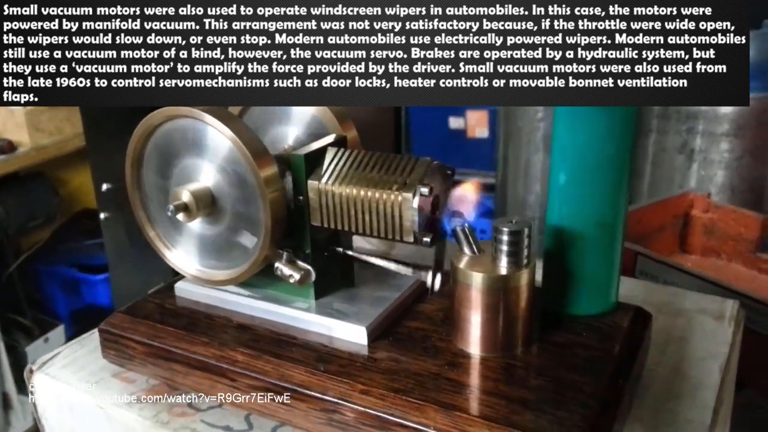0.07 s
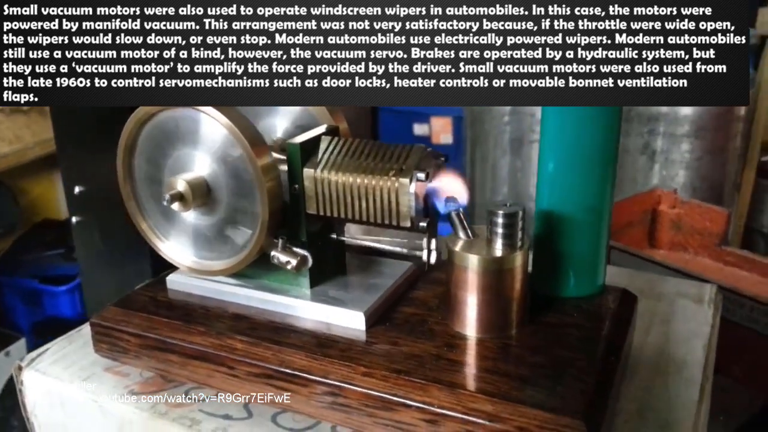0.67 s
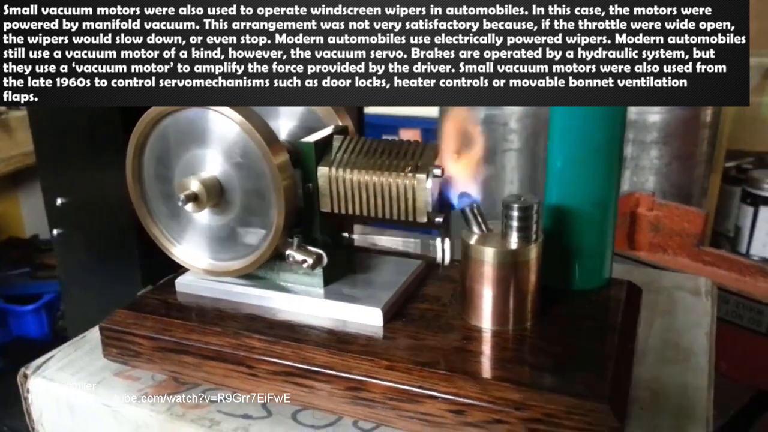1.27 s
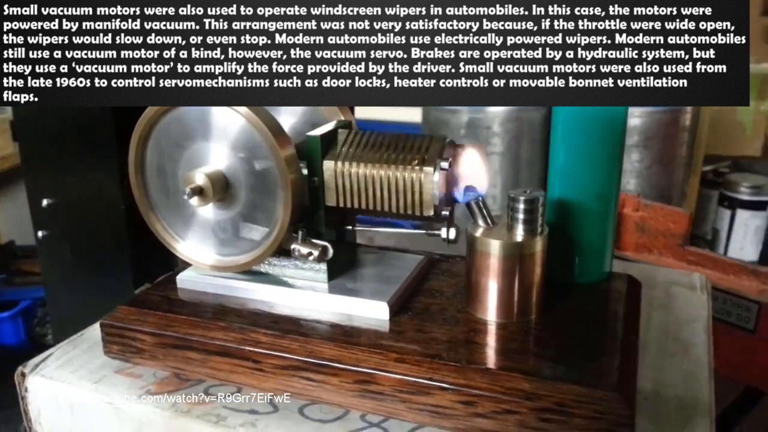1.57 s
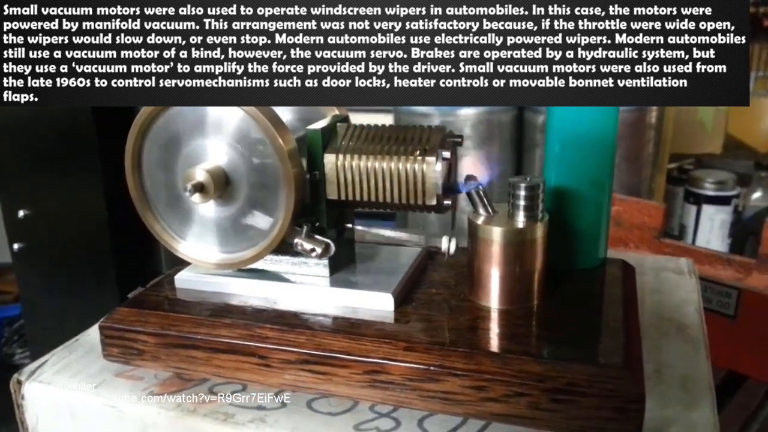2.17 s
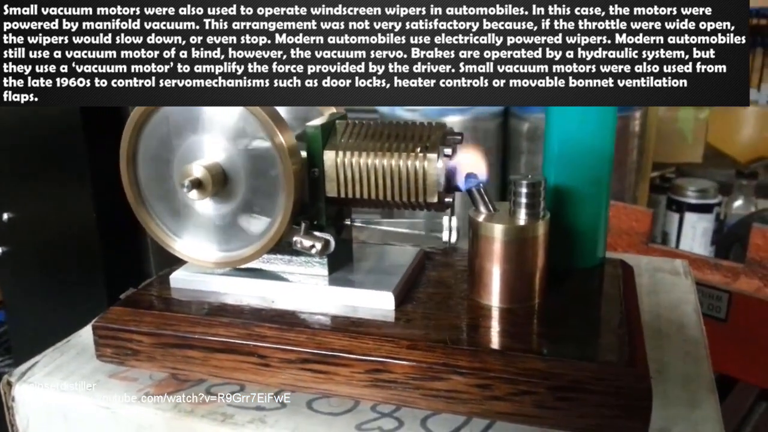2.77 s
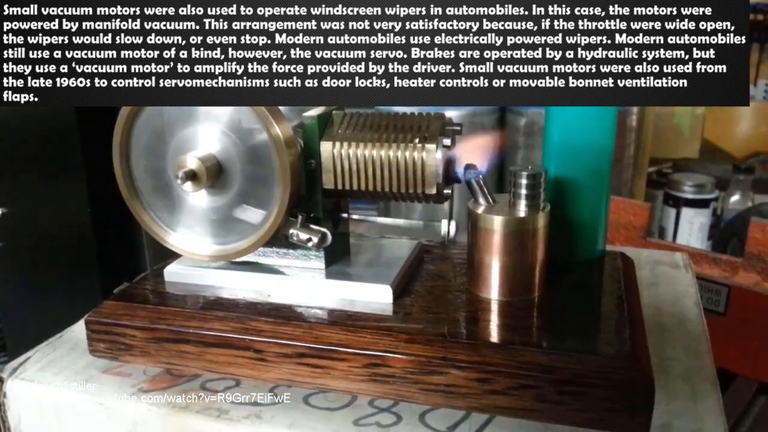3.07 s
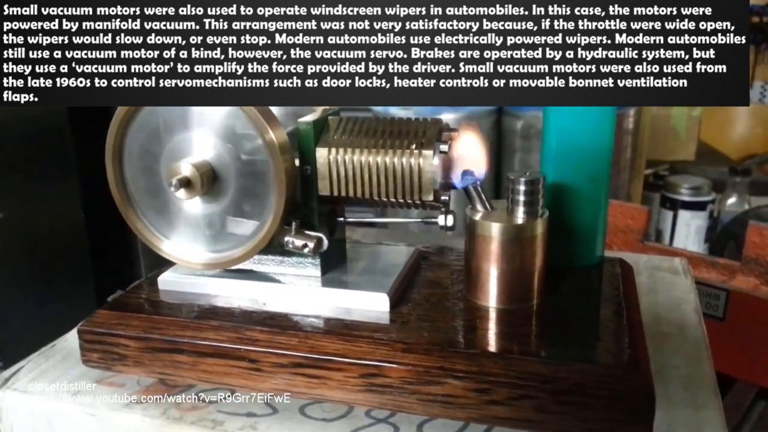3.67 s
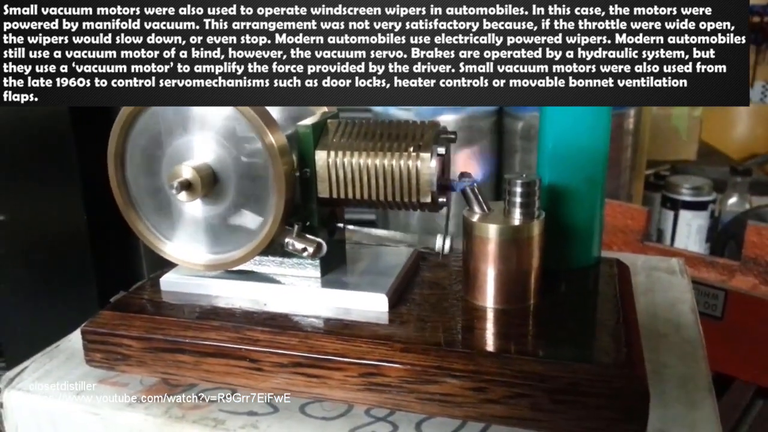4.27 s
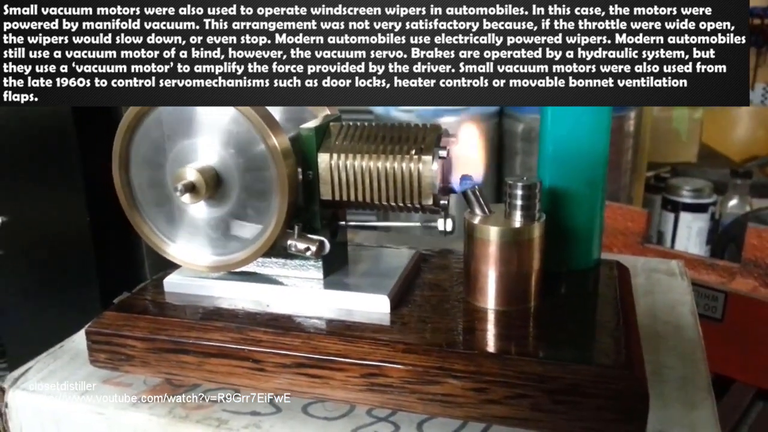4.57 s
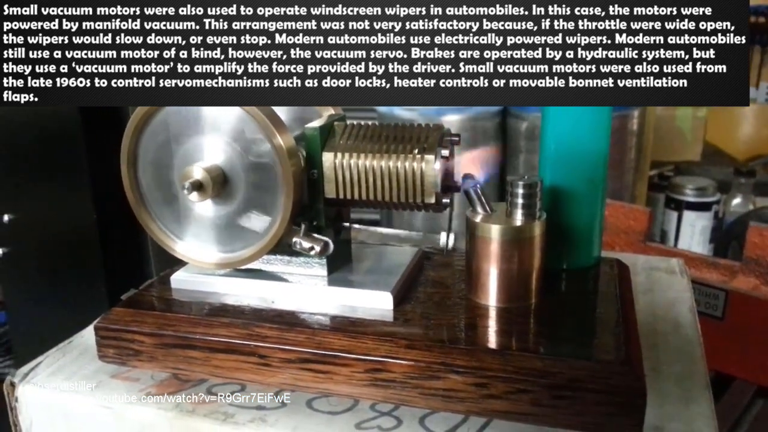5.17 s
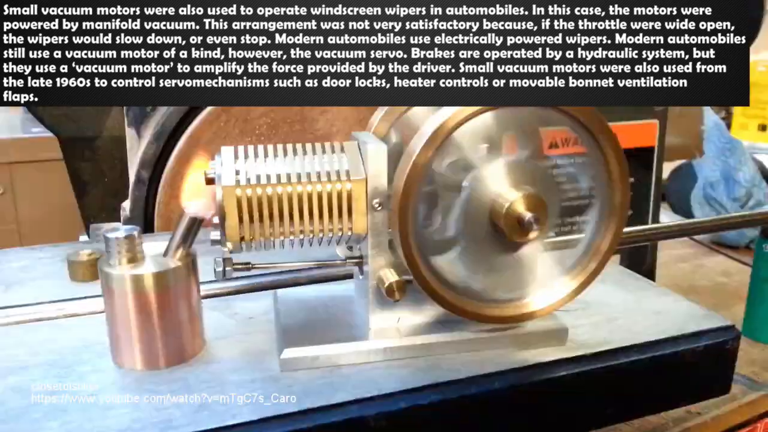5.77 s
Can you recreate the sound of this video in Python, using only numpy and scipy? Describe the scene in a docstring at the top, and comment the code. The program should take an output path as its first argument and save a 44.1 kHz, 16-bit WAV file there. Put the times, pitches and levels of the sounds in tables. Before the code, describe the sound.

A faint, steady whirr of bearings and flame is joined within 0.1 seconds by the tapping of a small flame-driven model engine on a wooden base. It runs evenly at nearly six turns a second. Each turn starts with a sharp metallic tap and knock from the shutter and a brief piston slide. A short, reedy quack of escaping gas follows, with slight hiss and a very thin, high squeak; then the linkage clicks and pings. On scattered turns a dry part gives a faint, high rub: around 0.4 to 1.1 seconds, often between 2 and 4.2, and twice after 5. The knocks are hardest near 4.8 seconds, then soften, while the beat continues until the sound ends at about 5.8. The stereo microphones are close, and the workshop adds only a slight, short reverberation.

```python
"""A faint whirr of bearings and flame, then at once the tapping of a small flame-licker engine, close to
a pair of microphones. It stands on a wooden base in a workshop and turns nearly six times a second.
Each turn the shutter taps and knocks shut, the piston slides, gas quacks out past the fluttering shutter
with a thin squeak, and the linkage clicks back. On some turns a dry part rubs before the next tap."""
import sys
import numpy as np
from scipy import signal
from scipy.fft import rfft, irfft
from scipy.io import wavfile
from scipy.ndimage import uniform_filter1d

SR = 44100
rng = np.random.default_rng(int(sys.argv[2]) if len(sys.argv) > 2 else 0)


def inscribe(sig):
    """Save sig as 16-bit PCM at rate SR to the path in sys.argv[1].

    A 1-D sig is mono; a 2-D sig holds one channel per row.
    Samples are clipped to [-1, 1] before scaling.
    """
    pcm = np.round(np.clip(np.atleast_2d(sig).T, -1, 1) * 32767)
    wavfile.write(sys.argv[1], SR, pcm.astype(np.int16))


N = 261061
TIME = np.arange(4096) / SR  # seconds into one short event


def amp(db):
    """Decibels to gain."""
    return 10 ** (np.asarray(db) / 20)


def unit_power(x):
    """Scales to a mean square of one."""
    return x / np.sqrt(np.mean(x ** 2) + 1e-20)


def at_hz(table, hz, column=1):
    """One column of a table, interpolated along log frequency."""
    columns = np.transpose(table)
    return np.interp(np.log(hz + 1), np.log(columns[0]), columns[column])


def add(mix, start_s, sound):
    """Mixes a sound in at a time."""
    part = mix[..., max(round(start_s * SR), 0):][..., :sound.shape[-1]]
    part += sound[..., :part.shape[-1]]


def convolve(x, response):
    """Filters both channels."""
    return signal.oaconvolve(x, response, axes=1)[:, :N]


def colour(x, spectrum, size=2048):
    """Causal filter of unit power gain with its own left-right balance in each band."""
    hz = abs(np.fft.fftfreq(size, 1 / SR))
    side_db = np.outer([.5, -.5], at_hz(spectrum, hz, column=2))
    gain = unit_power(amp(at_hz(spectrum, hz) + side_db))
    minimum_phase = np.exp(np.conj(signal.hilbert(np.log(gain))))
    return convolve(x, np.fft.ifft(minimum_phase).real)


def wobble(size, smooth_samples):
    """Smoothed random motion of unit power."""
    return unit_power(uniform_filter1d(rng.standard_normal(size), size=smooth_samples))


def envelope(rise, hold, t60):
    """Swells, holds until `hold`, dies away; all in seconds."""
    return np.minimum(TIME / rise, 1) ** 2 * np.exp(-np.log(1000) * np.maximum(TIME - hold, 0) / t60)


def strokes(times, level_db, scatter_db):
    """Rows of (time [s], level [dB]) with randomly scattered levels."""
    return np.column_stack([times, level_db + scatter_db * rng.standard_normal(len(times))])


def bursts(events, shape, spectrum, grit_db):
    """Gritty contact noise under one envelope for each event."""
    grit = amp(grit_db * np.clip(wobble(N, 25), -2, 2))
    contact = unit_power(np.tanh(unit_power(noise() * grit) / 2))  # no single grain outweighs the blow
    gate = np.zeros(N)
    for s, db in events:
        add(gate, s, amp(db) * shape)
    return colour(contact * gate, spectrum)


def ring(blows, modes, spread_db):
    """Blows ring a set of modes, never quite alike; high modes favour the right microphone."""
    out = np.zeros((2, N))
    hz, db, t60 = np.transpose(modes)[:, :, None]
    t = np.arange(SR // 5) / SR
    side_db = np.interp(hz.T, [2000, 6500], [1, 10]) * np.array([[-.5], [.5]])
    swell = 1 - np.exp(-t * hz / 1.95)  # a mode needs a cycle or two to build up
    for s, blow_db in blows:
        detune, spread = rng.standard_normal((2, len(modes), 1))
        fade = amp(blow_db + db + spread_db * spread) * np.exp(-np.log(1000) * t / t60)
        tones = np.sin(2 * np.pi * (hz + .5 * detune / t60) * t)
        add(out, s, amp(side_db) @ (swell * fade * tones))
    return out


def whistle(hz, waver_hz):
    """An unsteady tone of unit power, as stick and slip makes it."""
    return np.sqrt(2) * np.sin(2 * np.pi * np.cumsum(hz + waver_hz * wobble(len(TIME), 24)) / SR)


# how alike the two microphones hear noise: (frequency [Hz], likeness [0-1])
MIC_LIKENESS = [(40, 0), (150, 0.97), (1300, 1), (2500, 0.45), (5000, 0), (15000, 0.18)]
def noise():
    """Noise at the microphone pair, nearly mono in the middle range."""
    shared, separate = rfft(rng.standard_normal((2, N)))
    alike = np.clip(at_hz(MIC_LIKENESS, np.fft.rfftfreq(N, 1 / SR)), 0, 1)
    left = alike * shared + np.sqrt(1 - alike ** 2) * separate
    return irfft(np.array([left, shared]), N)


# background at the bench: (frequency [Hz], level [dB], left minus right [dB])
WHIRR_SPECTRUM = [(30.1, 8.5, 3), (113, -23, 2.5), (208, -0.5, -1.5), (365, 1.5, -4.5), (450, -7, 3.5),
                  (680, -9.5, -8), (1070, -13, 19), (1400, -8, 0.5), (2140, -8, 0.5), (4150, -12.5, -5),
                  (6850, -22.5, -2), (11000, -26, -2), (14300, -23.5, 0), (15500, -70, -19)]
def whirr():
    """Bearings and flame make a steady, faint noise under the engine."""
    return amp(-45) * colour(noise(), WHIRR_SPECTRUM)


# pace of the flywheel: (time [s], speed [turns/s])
FLYWHEEL_SPEED = [(0.0, 5.722), (1.1, 5.735), (1.9, 5.715), (2.4, 5.714), (3.1, 5.75), (3.55, 5.71),
                  (4.0, 5.758), (4.35, 5.632), (4.9, 5.649), (5.2, 5.669), (5.45, 5.82), (5.8, 5.486)]
# a dry part drags, so the shutter comes late and opens early: (turn [from 0], rub level [dB])
TIGHT_TURNS = [(2, -43), (4, -40), (6, -38.5), (11, -38), (12, -43), (15, -43), (17, -42), (18, -42.5),
               (20, -43.5), (22, -43), (23, -42.5), (24, -42.5), (29, -41.5), (31, -38.5)]
# the shutter runs loose, so it comes early, seats softly and opens late: (turn [from 0])
LOOSE_TURNS = [5, 21, 28, 30, 32]
def flywheel(first_turn_s=.0754):
    """When each turn starts, with the shutter at the port face, and whether it is tight or loose."""
    t = np.arange(N) / SR
    turned = np.cumsum(np.interp(t, *np.transpose(FLYWHEEL_SPEED))) / SR
    turned -= np.interp(first_turn_s, t, turned)
    number = np.arange(int(turned[-1]))
    tight = np.isin(number, [n for n, _ in TIGHT_TURNS])
    return np.interp(number, turned, t), tight, np.isin(number, LOOSE_TURNS)


KNOCK_S = .0038  # into the turn
# tap and knock, close to the port face: (frequency [Hz], level [dB], left minus right [dB])
TAP_SPECTRUM = [(200, -34, 0.5), (888, -36, 3.5), (1400, -18, -6), (2115, 2, -8.5), (2840, -13, 9),
                (4500, -4.5, -8.5), (5060, -23, 1), (6840, -6, -14), (8620, -20, -13.5), (9760, -20, -27),
                (11100, -20.5, 10), (14440, -15, -5.5), (15860, -50, 4)]
KNOCK_SPECTRUM = [(61, -19, -6), (246, -12, -1.5), (980, -6.5, 1.5), (1800, 4, -1), (2540, 0.5, -0.5),
                  (2740, -4.5, -3), (4560, -3, -8.5), (4790, -9, -7), (6730, -6.5, -17), (7760, -15.5, 1),
                  (10300, -30.5, 15.5), (13700, -13, 0.5), (15500, -46, 24)]
# how hard the shutter seats: (time [s], level [dB])
SEATING_LEVEL = [(0, -18), (2.2, -16), (3.1, -16.5), (3.8, -17), (4.8, -12.5), (5.2, -16.5), (5.7, -21.5)]
# the wooden base and metal frame on the bench: (frequency [Hz], level [dB], t60 [s])
FRAME_MODES = [(215, -21, 0.12), (260, -24.5, 0.067), (330.3, -15.5, 0.22), (396.7, -22.5, 0.34),
               (512, -36.5, 0.051), (620, -33.5, 0.052), (1059, -25, 0.13), (1778.4, -11, 0.04),
               (2160, -20.5, 0.11), (2374, -24, 0.064), (3520, -26.5, .04), (4050, -36, 0.057),
               (4260, -15.5, 0.14), (6370, -19, .03), (7246, -25, 0.033), (9820, -24, 0.09),
               (9700, -29.5, 0.085)]
def shutter(starts, tight, loose, late_s=.00061, early_s=.0022, knock_scatter_s=.0005):
    """The shutter taps the port face, glances off its seat and knocks home just after."""
    taps = strokes(starts + late_s * tight - early_s * loose, level_db=-18.5, scatter_db=.9)
    seating_db = np.interp(starts, *np.transpose(SEATING_LEVEL)) - 5.5 * loose
    seat_times = starts + KNOCK_S + knock_scatter_s * rng.standard_normal(len(starts))
    knocks = strokes(seat_times, seating_db, scatter_db=.1)
    tap = bursts(taps, envelope(.0004, .0013, .023), TAP_SPECTRUM, grit_db=2.5)
    glance = envelope(.0001, .0007, .011)
    home = np.interp(TIME - .0019, TIME, envelope(.00015, .00064, .0084))
    knock = bursts(knocks, glance * amp(-.5) + home * amp(4), KNOCK_SPECTRUM, grit_db=3)
    return tap + knock + ring(knocks, FRAME_MODES, spread_db=2.5)


# sliding, close to the cylinder: (frequency [Hz], level [dB], left minus right [dB])
SLIDE_SPECTRUM = [(40, -27, 14.5), (100, -33, -2.5), (199.4, -2, -5), (364, -2, 1), (450, -2.5, -1),
                  (885, -4.5, -2), (1640, -10.5, -1), (2335, -2, -4.5), (2980, -9, 5), (4070, -5, -3.5),
                  (6700, -17, -5.5), (11100, -32, -8), (14250, -60.5, 7), (15500, -62.5, 6)]
# the piston ringing in the bore: (frequency [Hz], level [dB], t60 [s])
PISTON_MODES = [(2170, -7.5, 0.045), (2340, -7.5, 0.038), (3920, -14.5, 0.043), (6500, -17, .03)]
def piston(starts, chatter_s=.0195):
    """The piston slides off with every knock and chatters once, partway out."""
    slides = strokes(starts + KNOCK_S, level_db=-26.5, scatter_db=0)
    slide = bursts(slides, envelope(.0037, .02, .055), SLIDE_SPECTRUM, grit_db=4)
    chatters = strokes(starts + chatter_s, level_db=-25.5, scatter_db=4)
    return slide + ring(chatters, PISTON_MODES, spread_db=4)


# one quack at the shutter gap: (share of its length [0-1], flutter [Hz], flow [dB], resonance [Hz])
QUACK_COURSE = [(0, 494, -43.5, 768), (0.099, 497.5, -13.5, 912), (0.231, 553, -4, 822),
                (.46, 525, -4, 1013), (.57, 549.7, -1, 1524), (0.692, 536.7, 2.03, 1290),
                (.82, 498, -0.5, 1040), (0.898, 494, -1, 982), (1, 535, -23, 1070)]
def quack(length_s, gap_q=1.6):
    """The shutter flutters like a reed; the gap's resonance rises and falls with the flow."""
    share = np.arange(0, 1, 1 / (length_s * SR))
    points, *columns = np.transpose(QUACK_COURSE)
    hz, flow_db, gap_hz = (np.interp(share, points, column) for column in columns)
    jitter = wobble(len(TIME), 80)[:len(share)]
    hz *= 1 + .005 * rng.standard_normal() + .0096 * jitter
    gap_hz *= 1 + .025 * rng.standard_normal()
    cycles = np.cumsum(hz) / SR
    harmonic = np.arange(1, 10)[:, None]
    gain = 1 / (1 + 1j * gap_q * (harmonic * hz / gap_hz - gap_hz / (harmonic * hz)))
    gain /= np.sqrt((abs(gain) ** 2).sum(0) / 2)  # the flow alone sets the level
    return (gain * np.exp(2j * np.pi * harmonic * cycles)).real.sum(0) * amp(flow_db)


# quack and hiss, close to the port: (frequency [Hz], level [dB], left minus right [dB])
PORT_SPECTRUM = [(80, -36.5, -1.5), (198.5, -21.5, 0.5), (628, 2, -2), (1195, 0.4, 0.3), (1690, 1.55, -1.5),
                 (2020, 0.9, 2), (2906, -12.5, 2.5), (3400, -14.5, 0.5), (6000, -21, -1.5)]
HISS_SPECTRUM = [(2700, 3, -2.5), (3780, 9, 1), (4930, 0.5, -3.5), (6810, 4.5, -13), (8820, -8, -3.5),
                 (10500, -13, -4), (14300, -13, 10.5), (15500, -22.5, -11.5)]
# resonances that linger after each puff: (frequency [Hz], level [dB], t60 [s])
PUFF_MODES = [(517, -23.5, 0.13), (1048, -19, 0.22), (2194, -21, .12)]
def exhaust(lifts, ends):
    """Gas escapes as the shutter lifts: each puff quacks, hisses and leaves a faint ring."""
    quacks = np.zeros((2, N))
    puffs = strokes(lifts, -14, scatter_db=.07)
    lengths = ends - lifts
    for (s, db), length_s in zip(puffs, lengths):
        add(quacks, s, amp(db) * quack(length_s))
    hiss = bursts(puffs, envelope(.0073, .019, .084) * amp(-13.5), HISS_SPECTRUM, grit_db=2)
    after_ring = ring(zip(lifts + .91 * lengths, puffs[:, 1]), PUFF_MODES, spread_db=1)
    return amp(-10) * colour(quacks, PORT_SPECTRUM) + hiss + after_ring


# strength of the squeak at the shutter: (time [s], level [dB])
SQUEAK_LEVEL = [(0, -19.5), (2.4, -19.5), (4.6, -17), (5.1, -24), (5.8, -23)]
def squeak(lifts, lag_s=.0055, pitch_hz=13400, scatter_hz=120):
    """Metal sticks and slips for a few milliseconds after each lift, right of centre."""
    out = np.zeros(N)
    level_db = np.interp(lifts, *np.transpose(SQUEAK_LEVEL))
    for s, db in strokes(lifts + lag_s, level_db, scatter_db=2.5):
        hold = .00093 * np.exp(.22 * rng.standard_normal())
        hz = pitch_hz + scatter_hz * rng.standard_normal()
        add(out, s, amp(db) * envelope(.0012, hold, .012) * whistle(hz, waver_hz=310))
    return out * amp([[-4.5], [2.5]])


# strength of the click at the rod: (time [s], level [dB])
CLICK_LEVEL = [(0, -22), (1.5, -20.5), (3, -20), (4.3, -19.5), (4.8, -21), (5.8, -21.3)]
# the click, close to the rod: (frequency [Hz], level [dB], left minus right [dB])
CLICK_SPECTRUM = [(300, -12, 5), (1510, -20, 17.5), (1850, 2.5, -4), (2980, -14.5, -10), (3250, -12, 10),
                  (4500, -9.5, -16.5), (5640, -11.5, 1.5), (6540, -10.5, -24), (8740, -13.5, -17),
                  (10470, -19, -7), (14300, -17.5, 3), (15270, -52, -21)]
# ping of the linkage: (frequency [Hz], level [dB], t60 [s])
LINKAGE_MODES = [(269, -9, 0.046), (2015, -3, 0.032), (2170, -10.5, 0.056), (3284, -16, 0.058),
                 (4670, -14, 0.066), (6570, -19.5, 0.021), (6680, -5, 0.018), (7840, -14.5, 0.02)]
def linkage(starts, click_s=.0951, slack_lead_s=.008):
    """The slack is taken up with a faint tick; then, past half a turn, the rod clicks and pings."""
    clicks = strokes(starts + click_s, np.interp(starts, *np.transpose(CLICK_LEVEL)), scatter_db=1.26)
    ticks = [(s - slack_lead_s, db) for s, db in clicks]
    slack = bursts(ticks, envelope(.00032, .0031, .11) * amp(-15.5), HISS_SPECTRUM, grit_db=23)
    click = bursts(clicks, envelope(.00024, .00053, .023) * amp(-1), CLICK_SPECTRUM, grit_db=3)
    return slack + click + amp(-1.5) * ring(clicks, LINKAGE_MODES, spread_db=3.5)


# friction, close to the dry spot: (frequency [Hz], level [dB], left minus right [dB])
RUB_SPECTRUM = [(1500, -17, 11), (2500, -15.5, -12.5), (3730, 0.5, 2), (5050, -6.5, -2), (6850, -13, -27),
                (6820, 7, -15.5), (8000, -26, -5), (10000, -23, -2), (14300, -26, 1), (15500, -46, 9.5)]
def dry_rub(tight_starts, lead_s=.0398, slip_s=.0029, slip_fade_s=.001):
    """Ahead of the tap on tight turns, a dry part rubs in quick slips and sings on the right."""
    rubs = [(s - lead_s, db) for s, (_, db) in zip(tight_starts, TIGHT_TURNS)]
    slips = amp(-1) + amp(7.5) * np.exp(-(TIME % slip_s) / slip_fade_s)
    rub = bursts(rubs, envelope(.00069, .014, .06) * slips, RUB_SPECTRUM, grit_db=12)
    song = np.zeros(N)
    for s, db in rubs:
        add(song, s, amp(db) * envelope(.0034, .021, .06) * whistle(hz=6820, waver_hz=130))
    return rub + song * amp([[-14], [-1]])


# the bench and, farther off, the walls: (delay [s], left level [dB], right level [dB])
REFLECTIONS = [(0.012, -29, -33), (0.0217, -44, -37), (0.029, -28.5, -17.5), (0.035, -19.5, -37.5),
               (0.058, -25, -38)]
# decay of the workshop around the microphones: (frequency [Hz], t60 [s])
ROOM_DECAY = [(200, 0.52), (1000, 0.11), (4000, 0.4), (14000, 0.054)]
def workshop(x, tail_db, dull_hz, build_s=.028):
    """The room returns a few dull reflections and a short diffuse tail."""
    size = SR // 3
    diffuse = rng.standard_normal((2, size)) * np.minimum(np.arange(size) / (build_s * SR), 1)
    hz, t, bands = signal.stft(diffuse + .6 * diffuse[::-1], SR, nperseg=256)  # sides partly alike
    decay = np.exp(-np.log(1000) * t / at_hz(ROOM_DECAY, hz)[:, None])
    tail = signal.istft(bands * decay, SR)[1]
    early = np.zeros_like(tail)
    for delay, left_db, right_db in REFLECTIONS:
        add(early, delay, amp([[left_db], [right_db]]))
    early = signal.sosfilt(signal.butter(4, dull_hz, fs=SR, output="sos"), early)
    return convolve(x, early + tail * amp(tail_db) / np.linalg.norm(tail[0]))


def scene():
    """The crank times every part of the engine; the room and the whirr lie behind it."""
    starts, tight, loose = flywheel()
    lift_s, spent_s = .0431, .0686  # gas escapes between these points of the turn
    lifts = starts + lift_s - .0011 * tight + .0018 * loose
    engine = shutter(starts, tight, loose) + linkage(starts) + piston(starts) + dry_rub(starts[tight])
    engine += exhaust(lifts, starts + spent_s) + squeak(lifts)
    return engine + workshop(engine, tail_db=-24.5, dull_hz=1120) + whirr()


def record(dry):
    """The microphone pair: the left hears slightly later; bass and top roll off, peaks are rounded."""
    bass_hz, top_hz, ceiling = 120, 15400, .66
    pair = np.array([np.roll(dry[0], 3), dry[1]])
    pair = signal.sosfilt(signal.butter(1, bass_hz, "highpass", fs=SR, output="sos"), pair)
    pair /= (1 + (pair / ceiling) ** 8) ** (1 / 8)
    pair *= np.interp(np.arange(N) / SR, [5.785, 5.8], [1, 0])  # quick fade to silence
    lowpass = signal.firwin(161, top_hz, window=("kaiser", 9), fs=SR)
    return signal.oaconvolve(pair, lowpass[None], "same")


dry = scene()
out = record(dry)
inscribe(out)
```